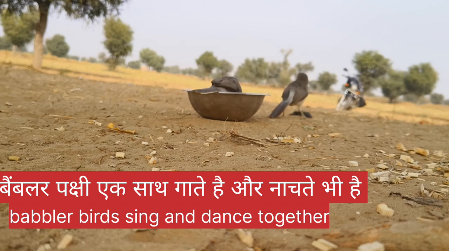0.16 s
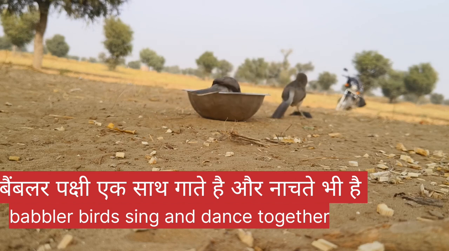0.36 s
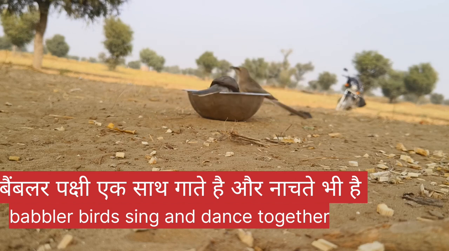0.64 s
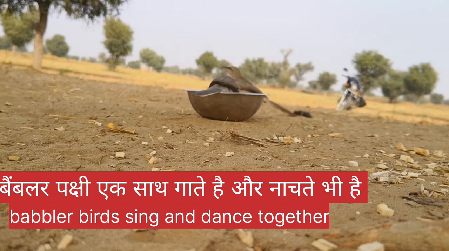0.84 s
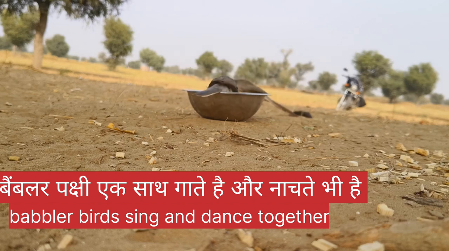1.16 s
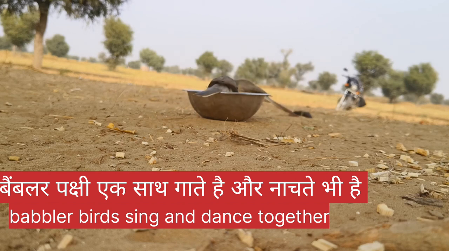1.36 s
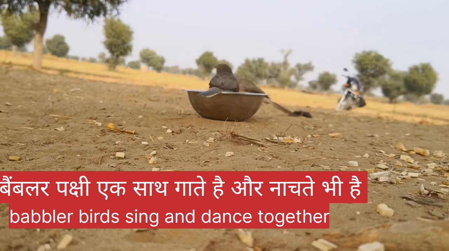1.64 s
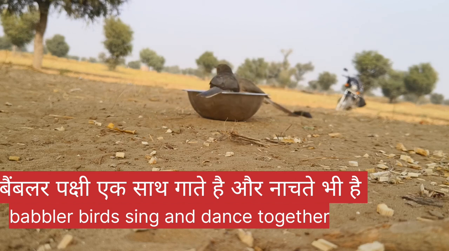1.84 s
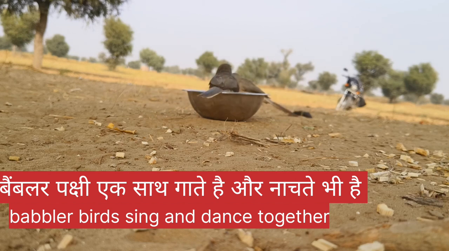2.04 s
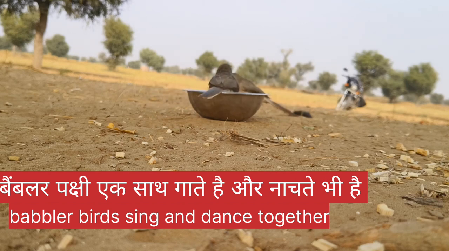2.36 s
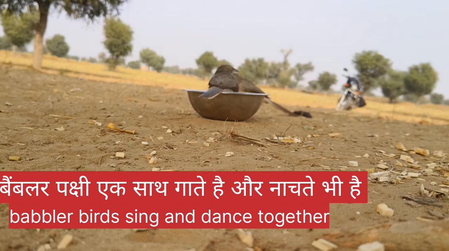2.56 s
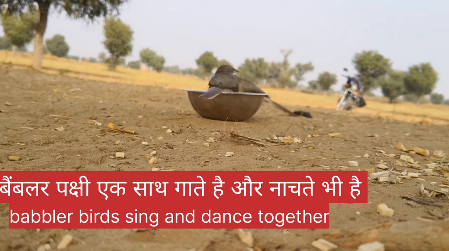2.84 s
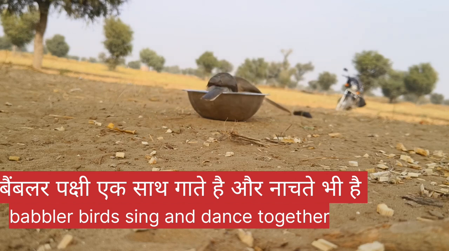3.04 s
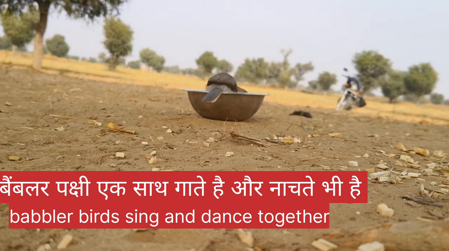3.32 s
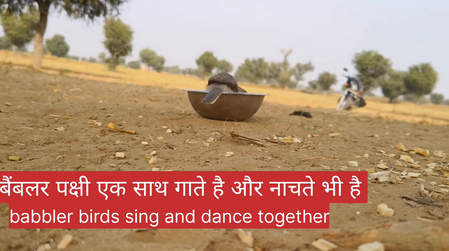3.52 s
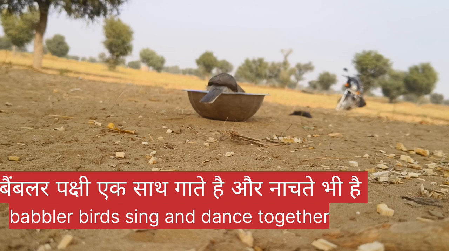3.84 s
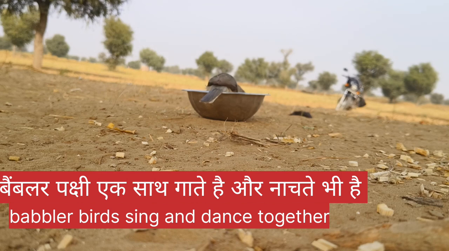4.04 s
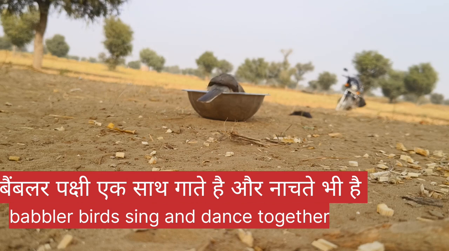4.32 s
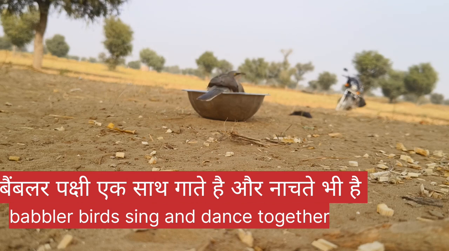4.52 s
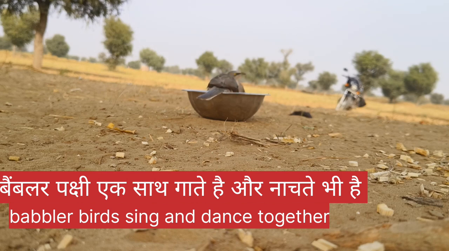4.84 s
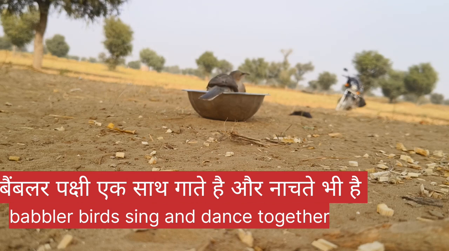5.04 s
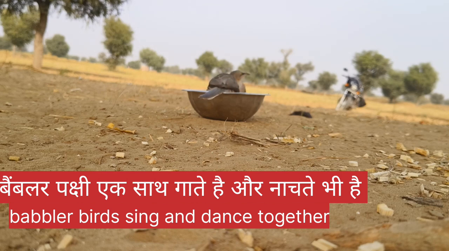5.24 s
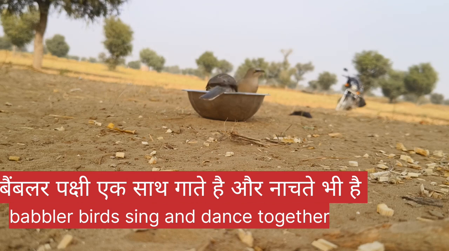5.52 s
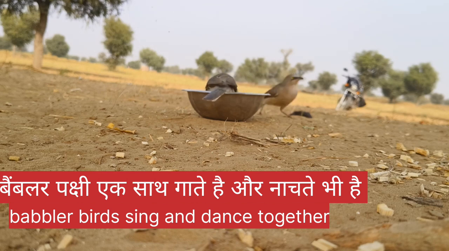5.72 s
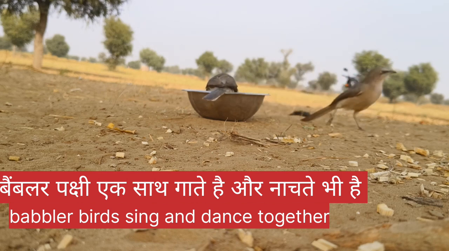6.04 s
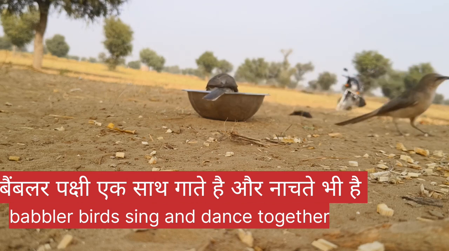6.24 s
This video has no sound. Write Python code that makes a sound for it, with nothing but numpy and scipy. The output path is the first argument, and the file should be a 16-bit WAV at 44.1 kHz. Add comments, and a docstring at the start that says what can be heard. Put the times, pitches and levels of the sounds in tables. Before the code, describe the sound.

Small birds chirp and give three harsh trills in an open dry field, with bowl taps and a distant low engine drone.

```python
"""Small birds chirp and trill around a metal bowl in a dry field; further birds pipe and churr lower notes.
Every bird is a near-sine gliding through three pitches. Beaks and claws tap the bowl, ringing damped modes;
feathers rustle as coloured noise. A distant three-cylinder engine drones as a stack of cycle multiples, a low
hoot swells and fades over its octave below, and light wind stirs noise bands of open air.
Nearby trees return birds, taps and rustle as a short diffuse tail."""
import sys
import numpy as np
from scipy import signal
from scipy.fft import rfft, irfft
from scipy.io import wavfile
from scipy.ndimage import uniform_filter1d

SR = 44100
rng = np.random.default_rng(int(sys.argv[2]) if len(sys.argv) > 2 else 0)


def master_out(mix):
    """Clip the mix to full scale and print it as 16-bit PCM to the path in sys.argv[1]."""
    frames = np.transpose(np.atleast_2d(mix))
    ceiling = np.clip(frames, -1, 1)
    pcm = np.round(ceiling * 32767).astype(np.int16)
    wavfile.write(sys.argv[1], SR, pcm)


N = 281358


def undb(db):
    """dB to amplitude gain."""
    return 10 ** (np.asarray(db) / 20)


def curve(rows):
    """Straight-line automation through (time_s, value) points, sample by sample."""
    return np.interp(np.arange(N) / SR, *np.transpose(rows))


def walk(rate):
    """Random levels, each held 1 / rate seconds and smoothed twice; spread near 1."""
    hold = int(SR / rate)
    steps = np.repeat(rng.standard_normal(N // hold + 1), hold)
    return 1.4 * uniform_filter1d(uniform_filter1d(steps, hold), hold)[:N]


def unit(x):
    """Scales to rms 1."""
    return x / np.sqrt(np.mean(x ** 2))


def add(out, start_s, pair):
    """Mixes a stereo event into out, cut off at the end."""
    i = int(start_s * SR)
    out[:, i:i + pair.shape[1]] += pair[:, :N - i]


def balance(pan_db):
    """Left and right gains pan_db apart, of constant total power."""
    gains = undb(np.array([[pan_db / 2], [-pan_db / 2]]))
    return gains / np.sqrt(np.mean(gains ** 2, axis=0))


def birds():
    """Near chirps, three alike harsh trills and the far birds; the further the bird, the wetter."""
    # syllables of each call: offset_s, length_ms, start_hz, middle_hz, end_hz, start_db, middle_db, end_db
    tsip = [(0, 21, 6550, 6750, 5100, -6, 1.5, -3), (.05, 19, 5480, 5600, 5050, -5, -2.5, -11.5)]  # a fall, then a low arch
    peak = [(0, 27, 5550, 8100, 4600, -7.5, -11, 0.94), (.043, 23, 5050, 5500, 4600, -2, 0.5, -4)]  # a tall arch, then a low one
    double = [(0, 18, 6900, 6700, 5000, -9, -7, -10), (.019, 17, 6800, 6700, 4700, -9, -6, -8),
              (.049, 19, 5400, 6050, 4700, -5, -1, -8), (.068, 18, 5500, 6050, 4400, -5, 0, -9)]  # two falls, two arches
    fall = [(0, 19, 6950, 6500, 5200, -4, 0, -1)]  # a single fall
    arch = [(0, 42, 5900, 6450, 5500, -2, 0.015, -4)]  # a single long arch
    seep = [(0, 28, 4800, 4850, 4830, -1, 0, 0)]  # a thin level note
    trill = [(0, 21, 6300, 5930, 3950, -5, 1, -8), (.018, 19, 6350, 5800, 3900, -12, -6, -4),
             (.037, 20, 4600, 5450, 3450, -5, .1, -7), (.056, 19, 4700, 5400, 3500, -7, -3, -9),
             (.0745, 19, 4350, 5150, 3400, -6, -3, -10), (.092, 19, 4500, 5100, 3500, -9, -3, -10)]  # two falls, four arches
    # singings of each call: start_s, stretch (factor), pitch (factor), level_db,
    # pan_db (left minus right, for a note at level_hz)
    tsips_sung = [(0.088, 1.01, 0.96, -67.5, 11), (1.362, 1.2, 0.98, -70.5, 10.5),
                  (3.068, 1.07, 1.001, -61.5, 8), (4.141, 1.1, 0.94, -63.5, 4.5)]
    peaks_sung = [(.198, 0.9, 0.97, -79.5, 1.6), (2.563, 1.05, .94, -75, 4), (4.036, 1.0, 1.01, -59.5, 5.1),
                  (5.108, 0.97, 0.985, -57, 3.3), (5.804, 0.97, 0.98, -58, 2.6)]
    doubles_sung = [(3.792, 0.48, 0.9, -70.5, 0.5), (4.584, 1.001, 1.003, -66, 0.38),
                    (5.234, 1.001, 0.975, -61, 0.39), (5.851, 1.001, .99, -54, 0.5)]
    falls_sung = [(4.509, 0.95, 1.0, -69.5, 3), (5.067, 1.24, 0.99, -62, 4.5), (5.784, 1.2, .99, -60, 6)]
    arches_sung = [(5.591, 1.09, 1.014, -57.5, -1), (5.901, 0.88, 1, -57, -1), (6.186, 1, 0.991, -56, -1)]
    seeps_sung = [(.54, 0.91, 0.96, -88, 7), (3.42, 0.75, 1.02, -87, -8), (4.011, 1.1, 1.01, -84, 9)]
    trills_sung = [(1.925, 1.02, 1.01, -44, -.5), (3.531, 1.01, .995, -44.5, -.5),
                   (4.924, 1.015, .99, -45.5, -.5)]
    # lower notes of the further birds, clear pipes and hoarse churrs:
    # start_s, length_ms, start_hz, end_hz, level_db (mid-note)
    pipe_notes = [(.97, 35, 2080, 2324, -78), (1.1, 28, 2220, 2140, -75.5), (1.22, 32, 1990, 1900, -74.5),
                  (2.313, 44, 2180, 2270, -66.5), (2.412, 32, 2310, 2443, -66.5),
                  (2.538, 26, 2660, 2600, -66), (2.558, 19, 2320, 2260, -69), (2.728, 40, 1950, 2474, -61),
                  (2.82, 29, 2406, 2270, -66), (2.961, 33, 2497, 2455, -66), (3.219, 19.6, 2274, 2416, -69),
                  (5.755, 38, 2210, 2484, -62), (5.795, 14, 2560, 2620, -76),
                  (5.957, 28, 2210, 2466, -60.5)]
    churr_notes = [(2.425, 60, 2360, 2720, -80.5), (2.485, 51, 1750, 2140, -73.5),
                   (2.56, 41, 2700, 2090, -78), (2.715, 36, 2413, 2054, -75),
                   (2.845, 52, 2055, 1663, -74.5), (2.995, 39, 2600, 1904, -78.5),
                   (3.07, 65, 2430, 2280, -83.5), (5.76, 58, 1550, 1666, -72), (5.852, 61, 2550, 2040, -69),
                   (5.98, 60, 2454, 1794, -70.5), (6.148, 69, 2350, 1804, -71.5),
                   (6.24, 44, 1850, 2090, -77.5), (6.255, 56, 2750, 2660, -91)]

    kinds = [(tsip, tsips_sung), (peak, peaks_sung), (double, doubles_sung),
             (fall, falls_sung), (arch, arches_sung), (seep, seeps_sung)]
    chirp_notes = []
    for syllables, singings in kinds:
        chirp_notes += calls(syllables, singings, lag_ms=-.032, left_db_per_khz=5.5)
    trill_notes = calls(trill, trills_sung, lag_ms=.272, left_db_per_khz=5)

    chirps = whistles(chirp_notes, edge=.17, flat=1.1, waver=.008, rasp=.12, size=32,
                      overtone_db=-32, half_db=-50, hiss_db=-46)
    trills = whistles(trill_notes, edge=.14, flat=1.5, waver=.013, rasp=.35, size=36,
                      overtone_db=-17, half_db=-36, hiss_db=-32)
    pipes = whistles(far_notes(pipe_notes), edge=.35, flat=1, waver=.012, rasp=.3, size=70,
                     overtone_db=-90, half_db=-90, hiss_db=-60)
    churrs = whistles(far_notes(churr_notes), edge=.3, flat=1, waver=.065, rasp=.9, size=36,
                      overtone_db=-90, half_db=-90, hiss_db=-60)
    return echo(chirps, wet_db=-8.5) + echo(trills, wet_db=-9.0) + echo(pipes + churrs, wet_db=-5.0)


def calls(syllables, singings, lag_ms, left_db_per_khz):
    """Lays out the notes of one kind of call; the higher a note's middle pitch, the further left."""
    level_hz = 6200
    notes = []
    for start_s, stretch, pitch, level_db, pan_db in singings:
        for offset_s, ms, a_hz, b_hz, c_hz, a_db, b_db, c_db in syllables:
            note_pan_db = pan_db + left_db_per_khz * (b_hz - level_hz) / 1000
            notes.append((start_s + stretch * offset_s, stretch * ms,
                          pitch * a_hz, pitch * b_hz, pitch * c_hz,
                          level_db + a_db, level_db + b_db, level_db + c_db, note_pan_db, lag_ms))
    return notes


def far_notes(rows):
    """Straight glides that end louder than they begin, a little to the right."""
    pan_db, lag_ms, start_db, end_db = -2, .088, .5, 5.5
    return [(s, ms, a_hz, (a_hz + c_hz) / 2, c_hz, db + start_db, db, db + end_db, pan_db, lag_ms)
            for s, ms, a_hz, c_hz, db in rows]


def whistles(notes, edge, flat, waver, rasp, size, overtone_db, half_db, hiss_db):
    """Near-sine notes on a pitch parabola: flat lingers mid-note, waver shakes pitch, rasp flutters level."""
    out = np.zeros((2, N))
    for start_s, ms, a_hz, b_hz, c_hz, a_db, b_db, c_db, pan_db, lag_ms in notes:
        length = ms * SR / 1000
        u = np.arange(int(length)) / length  # 0 to 1 through the note
        v = .5 + .5 * np.sign(u - .5) * np.abs(2 * u - 1) ** flat
        # parabola through the start, middle and end pitch
        hz = 2 * a_hz * (v - .5) * (v - 1) - 4 * b_hz * v * (v - 1) + 2 * c_hz * v * (v - .5)
        # noise smoothed over size samples, brought back to a spread near 1
        noise = rng.standard_normal((2, 8192))
        smooth = uniform_filter1d(uniform_filter1d(noise, size), size)
        drift, flutter = smooth[:, :len(u)] * np.sqrt(1.5 * size)
        hz = hz * (1 + waver * drift)

        level = undb(np.interp(u, [1 / 6, .5, 5 / 6], [a_db, b_db, c_db])) * (1 + rasp * flutter)
        fade = np.sin(np.pi / 2 * np.clip(np.minimum(u, 1 - u) / edge, 0, 1)) ** 2
        shape = level * np.sqrt(2) * fade

        # the left side hears the note lag_ms later (earlier if negative)
        phase = 2 * np.pi * (np.cumsum(hz) / SR - np.outer([lag_ms / 1000, 0], hz))
        # the overtone carries best where the pitch dips
        overtone = undb(overtone_db) * np.clip(4000 / hz, 0, 1.1) ** 11 * np.sin(2 * phase)
        # a strained voice adds the half pitch and a bright hiss
        half = undb(half_db) * np.sin(phase / 2)
        hiss = undb(hiss_db) * rng.standard_normal((2, len(u)))
        tone = np.sin(phase) + overtone + half + hiss
        add(out, start_s, tone * shape * balance(pan_db))
    return out


def taps():
    """Each tap rings the damped modes of bowl and rim, slightly detuned, under a brief noise crack."""
    # modes of the bowl, then of its rim: mode_hz, level_db (relative), t60_s (before the ring factor)
    bowl_modes = [(1390, -6, 0.1), (1643, 14, 0.016), (1764, 10, 0.027), (2000, 0, 0.023)]
    rim_modes = [(780, -4, .02), (1050, 1, .025), (2580, -7, .035), (3600, -7, .025), (3830, -1, .03),
                 (7270, -24, .03)]
    # taps of beaks and claws: start_s, bowl_db, rim_db, crack_db, brightness_db_per_octave,
    # ring (decay length factor), pan_db (left minus right)
    tap_events = [(0.7645, -63.5, -71, -62, .1, 0.69, 3), (1.512, -71, -104, -81, 1, 1.01, -1),
                  (4.383, -57.5, -99, -78, .1, 0.74, 4.5), (4.4916, -53.5, -46.5, -81, -4, 1.1, 8.5),
                  (4.5, -66, -53, -84, 3, 1.6, 9), (5.084, -54, -92, -73, 3, 0.89, -5),
                  (5.796, -64, -62, -74, 5, 1.6, 14), (5.801, -69, -55, -78, -4, 1.01, 5),
                  (5.8272, -49.5, -48, -42, 4.5, .6, -5.5), (5.841, -66, -63, -45, 1, 0.77, 12)]
    out = np.zeros((2, N))
    t = np.arange(SR // 8) / SR
    attack = np.sin(np.pi / 2 * np.minimum(t / .0013, 1)) ** 2

    def decay(t60_s):
        """Soft attack and exponential decay."""
        return np.exp(-np.log(1000) * t / t60_s) * attack

    for start_s, bowl_db, rim_db, crack_db, bright_db, longer, pan_db in tap_events:
        modes = [(hz, db + bowl_db, t60_s) for hz, db, t60_s in bowl_modes]
        modes += [(hz, db + rim_db, t60_s) for hz, db, t60_s in rim_modes]
        detune = 1 + .018 * rng.standard_normal(len(modes))
        ring = 0
        for (hz, db, t60_s), shift in zip(modes, detune):
            gain = undb(db + bright_db * np.log2(hz / 1700))
            ring = ring + gain * decay(longer * t60_s) * np.sin(2 * np.pi * hz * shift * t)

        noise = np.diff(rng.standard_normal((2, len(t) + 1)))  # differencing brightens it
        crack = undb(crack_db) * (.16 * noise[0] + .97 * noise) * decay(.022)
        add(out, start_s, (ring + crack) * balance(pan_db))
    return out


def rustle():
    """Feathers and dry dust: coloured noise in dense grains of uneven level, swelling fast and dying away."""
    # swells: peak_s, level_db, t60_s
    swells = [(.592, -81, 0.29), (.768, -83, 0.3), (4.49, -72, 0.25), (5.797, -64.5, 0.043),
              (5.829, -55, 0.041), (5.844, -49.5, 0.029), (5.86, -70, 0.34)]
    # spectrum of the grain: freq_hz, level_db (relative)
    colour_points = [(700, -5), (2000, -5.5), (4500, 3.5), (8500, -6.5), (11000, 1), (15000, -4.5)]
    rise_db_per_ms = 1.6
    grain_db = 2.2 * rng.exponential(size=N // 64 + 1)  # one level per 64 samples
    clicks = rng.standard_normal((2, N)) * undb(grain_db).repeat(64)[:N]
    hz, db = np.transpose(colour_points)
    colour_db = np.interp(np.log(np.fft.rfftfreq(N, 1 / SR) + 1), np.log(hz), db, left=-60)
    # a strong shared part keeps the image near the centre
    grain = unit(irfft(rfft(3.0 * clicks[0] + clicks) * undb(colour_db), N))

    t = np.arange(N) / SR
    level = 0
    for peak_s, level_db, t60_s in swells:
        rise_db = rise_db_per_ms * 1000 * (t - peak_s)
        fall_db = 60 * (peak_s - t) / t60_s
        level = level + undb(level_db + np.where(t < peak_s, rise_db, fall_db))
    return grain * level


def echo(dry, wet_db):
    """Ground and trees scatter the sound back as a short diffuse tail, partly different on each side."""
    t60_s, start_s = .105, .008
    t = np.arange(SR // 3) / SR
    tail = rng.standard_normal((3, len(t))) * np.exp(-np.log(1000) * t / t60_s) * (t > start_s)
    # each side mixes its own tail with a shared one
    tail = (tail[1:] + tail[0]) / np.sqrt(np.sum(tail[0] ** 2))
    return dry + undb(wet_db) * signal.fftconvolve(dry, tail, axes=1)[:, :N]


def engine():
    """Multiples of a slowly sinking cycle; those three apart beat in step, at the firing rate."""
    # engine cycle: time_s, cycle_hz
    cycle_points = [(0, 8.42), (6.38, 8.318)]
    # loudness of the whole drone: time_s, level_db
    drone_level = [(0.0, -41), (1.33, -41.5), (2.4, -43), (4.0, -44.5), (5.26, -43), (5.9, -44.5),
                   (6.38, -45.5)]
    # partials: multiple (of the cycle), level_db (relative to each other)
    partials = [(5, -62.5), (6, -70), (7, -65), (8, -53), (9, -69), (10, -64), (11, -50.5), (12, -48.5),
                (13, -66), (14, -51), (15, -61), (16, -58), (17, -56), (18, -65), (19, -68), (20, -61),
                (23, -68), (24, -73), (25, -73), (28, -80), (29, -80), (30, -86)]
    highs_late = .085  # radians per squared multiple: each firing sweeps upward, the high multiples trail
    cycle_hz = curve(cycle_points)
    # the left side hears it 0.4 ms later
    turns = 2 * np.pi * (np.cumsum(cycle_hz) / SR - np.outer([.0004, 0], cycle_hz))
    family_phase = rng.uniform(0, 2 * np.pi, size=3)
    drone = 0
    for k, level_db in partials:
        gain = undb(level_db + 1.8 * walk(4))
        offset = family_phase[int(k) % 3] - highs_late * k ** 2 + .2 * walk(1.5)
        drone = drone + gain * np.sin(k * turns + offset)
    return unit(drone) * undb(curve(drone_level))


def hoot():
    """A soft wavering sine that swells and fades over a steadier one an octave down."""
    # swells of the upper tone: time_s, level_db (peak amplitude)
    hoot_level = [(0.0, -83.5), (.45, -74), (1.03, -61), (1.2, -79.5), (1.95, -78.5), (2.04, -66),
                  (2.4, -75.5), (2.58, -59.5), (2.75, -64), (2.95, -75.5), (3.9, -79.5), (4.1, -59),
                  (4.25, -75), (4.5, -64.5), (4.7, -75.5), (5.15, -70), (5.55, -72.5), (5.8, -69),
                  (6.38, -69)]
    pitch_hz, under_db = 421.4, -63
    turns = 2 * np.pi * pitch_hz * np.arange(N) / SR + .5 * walk(9.6)
    upper = undb(curve(hoot_level) + 1.6 * walk(5.5)) * np.sin(turns)
    under = undb(under_db + 1.1 * walk(.96)) * np.sin(turns / 2)
    return upper + under


def air():
    """Open-country hush: noise in octave bands that flicker independently; the lowest follow the wind."""
    # spectrum of the hush: freq_hz, mid_db_per_hz, side_db (side minus mid), pan_db (left minus right)
    spectrum = np.array([(20.2, -91.5, -5.5, 2.5), (42.3, -78.5, -7, -1.5), (55.6, -68, -14, 0.5),
                         (120.4, -73, -12, 0.5), (185, -82.5, -18.5, 1), (278, -90, -0.5, 5.5),
                         (648, -100, 2.8, -5), (1050, -104, 1, -6), (2010, -112, 0.5, -2.5),
                         (2550, -119, 1.5, -0.5), (3140, -130, 1.5, 3), (5400, -133, 2, 0.6),
                         (9700, -138, 0, -0.8), (14000, -136, 0, -0.5)])
    # gusts: time_s, level_db (only its departure from the mean is used)
    wind_level = [(0.0, -52.5), (.89, -50), (1.5, -59), (2.4, -58), (4.9, -57), (5.37, -48), (5.6, -60),
                  (6.38, -53.5)]
    log_hz = np.log(np.fft.rfftfreq(N, 1 / SR) + 1)
    mid_db, side_db, pan_db = (np.interp(log_hz, np.log(spectrum[:, 0]), spectrum[:, k]) for k in (1, 2, 3))
    mid, side = rfft(rng.standard_normal((2, N))) * np.sqrt(SR / 2)  # unit power per Hz
    stereo = mid + undb(side_db) * side * [[1], [-1]]
    pair = undb(mid_db) * stereo * undb(np.outer([.5, -.5], pan_db))

    gust_db = curve(wind_level) - np.mean(curve(wind_level))
    octave = np.log(2)
    out = 0
    for centre in np.log(20) + octave * np.arange(11):
        share = np.clip(1 - np.abs(log_hz - centre) / octave, 0, 1)
        wind_share = np.clip((np.log(140) - centre) / 1.2, 0, 1)  # none for bands centred above 140 Hz
        out = out + irfft(pair * share, N) * undb(1.4 * walk(12) + gust_db * wind_share)
    return out


def scene():
    """Near events with their echo over the drone, the hoot and the open air."""
    near = birds() + echo(taps(), wet_db=-24) + echo(rustle(), wet_db=-6.5)  # the bowl is close, so drier
    return near + engine() + hoot() * balance(.41) + air()


def record(dry):
    """Fades in over 6 ms and steeply cuts the top above 15650 Hz."""
    fade_in = np.sin(np.pi / 2 * np.minimum(np.arange(N) / (.006 * SR), 1)) ** 2
    low_pass = signal.ellip(12, .2, 80, 15650, fs=SR, output="sos")
    return signal.sosfilt(low_pass, dry * fade_in)


dry = scene()
out = record(dry)
master_out(out)
```